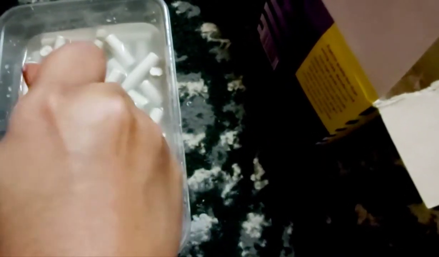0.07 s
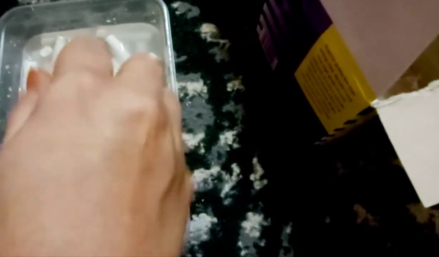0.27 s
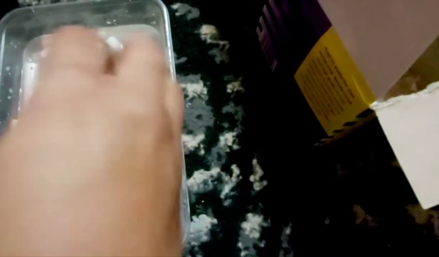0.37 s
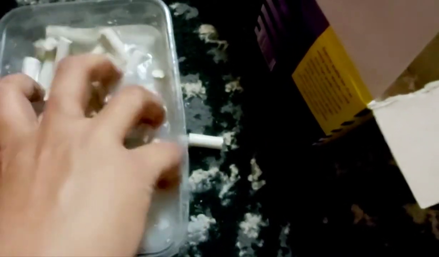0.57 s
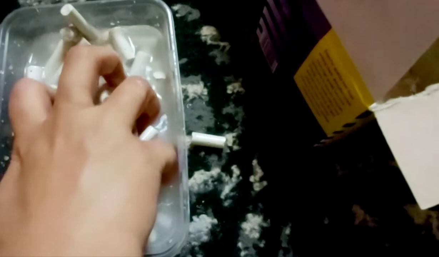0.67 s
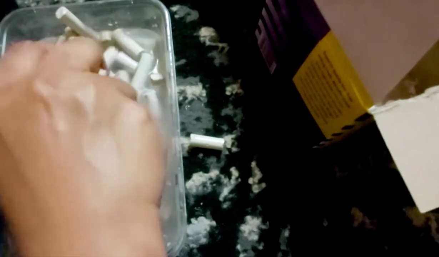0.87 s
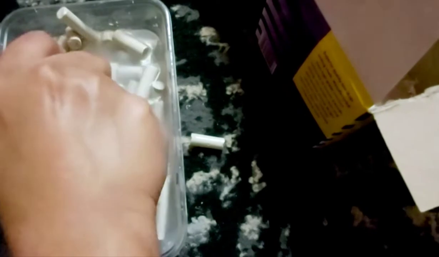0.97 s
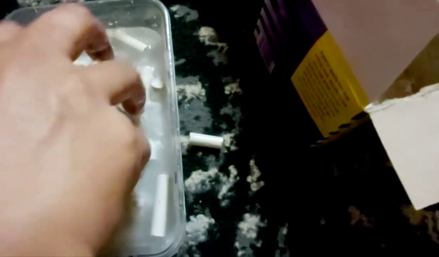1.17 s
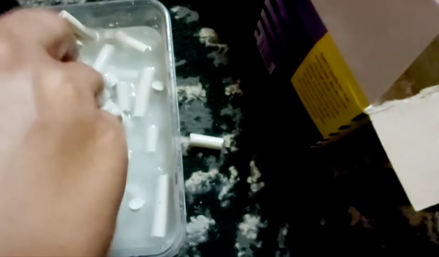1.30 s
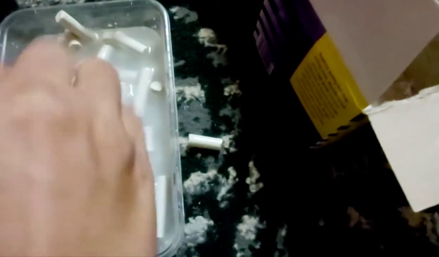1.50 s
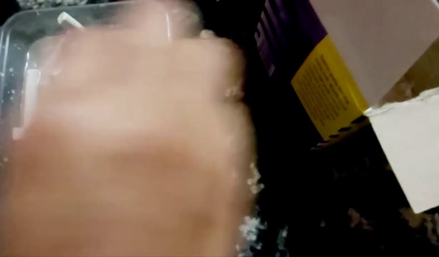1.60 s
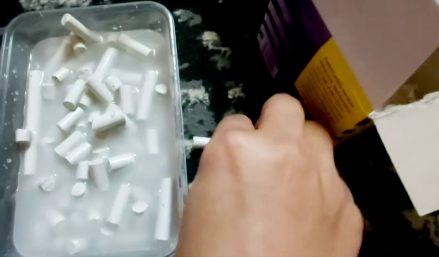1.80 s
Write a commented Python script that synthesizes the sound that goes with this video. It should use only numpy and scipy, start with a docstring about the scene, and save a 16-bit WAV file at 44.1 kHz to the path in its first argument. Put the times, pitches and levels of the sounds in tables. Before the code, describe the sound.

Broken chalk scrapes and rustles as a hand stirs it in a plastic tub of shallow water, close and slightly left. It starts softly, with a faint squeak at 0.4 seconds. From 0.5 seconds the pushes strengthen and sticks click together, sharpest near 0.95 and 1.35 seconds. The stirring dies away by 1.5 seconds, leaving a faint rustle and tick. Soft handling bumps rumble over quiet room tone.

```python
"""Broken chalk sticks, stirred by hand in a plastic tub of shallow water, close to a phone in a small room.
Each push drags the pieces in tiny slips that ring the tub, and wet crumbs rustle under the fingers.
Sticks knock together with sharp clicks, and one squeaks briefly as it slides.
The tub sits left of the phone's two microphones; soft handling bumps rumble over the room tone."""
import sys
import numpy as np
from scipy import signal
from scipy.fft import rfft, irfft
from scipy.io import wavfile

SR = 44100
rng = np.random.default_rng(int(sys.argv[2]) if len(sys.argv) > 2 else 0)


def file_out(sig):
    """Save sig as 16-bit WAV at sys.argv[1]."""
    # one column per channel
    cols = np.atleast_2d(sig).T
    # limit, then scale
    lim = np.clip(cols, -1, 1)
    pcm = np.round(lim * 32767).astype(np.int16)
    wavfile.write(sys.argv[1], SR, pcm)


N = 81585
T = np.arange(N) / SR
HZ = np.maximum(np.fft.rfftfreq(2 * N, 1 / SR), 1)

# Pushes that grind chalk along the tub. Each row: peak, rise and fall times in seconds, relative level
# in dB, gritty edge in dB against that level, tone in Hz, tone in dB against that level.
PUSHES = [(0.019, 0.045, 0.02, -47, -12.5, 940, -4), (0.103, 0.017, 0.033, -46.5, -9, 2340, -7),
          (0.177, 0.0012, 0.0029, -39.5, -21, 2670, -9), (.324, 0.0075, 0.017, -57.5, 8, 5470, -2),
          (0.515, 0.008, 0.022, -44.5, -37, 1170, -2), (0.544, 0.0083, 0.0051, -41, -11, 875, 0.5),
          (0.619, 0.022, 0.019, -35.5, -10.5, 2310, -9.5), (0.636, 0.0043, 0.01, -35.5, -7.5, 1010, -25),
          (0.696, 0.02, 0.035, -39.5, -16.5, 1400, -10), (0.747, 0.031, 0.023, -43.5, -14, 846, -1.5),
          (0.809, 0.017, 0.022, -34, -15, 1910, -8), (0.834, 0.0032, 0.024, -33.5, -18, 970, -23),
          (0.909, 0.025, 0.029, -41, -16, 2420, -20), (0.948, 0.0065, 0.008, -42.5, 6, 4330, -6),
          (0.961, 0.0083, 0.0071, -30, -12.5, 2140, -1), (1.025, 0.053, 0.03, -43, -10.5, 2500, -4),
          (1.073, 0.014, 0.013, -35, -5.5, 2700, -1.5), (1.12, 0.056, 0.05, -41.5, -19, 1350, -8),
          (1.2, 0.027, 0.0049, -48, -8.5, 2390, -1.5), (1.242, 0.0065, 0.0037, -48.5, -4, 985, 2),
          (1.296, 0.02, 0.036, -43, -15, 5650, -9), (1.324, 0.0053, 0.012, -29, -16, 910, 1.5),
          (1.367, 0.025, 0.02, -30.5, -7.5, 1020, -5), (1.403, 0.0076, 0.016, -34.5, -10, 710, -4)]
# Colour of the grinding. Each row: frequency in Hz, relative gain in dB.
SCRAPE_SPECTRUM = [(80, -6.5), (170, 3), (240, -5), (420, -0.5), (700, 1), (1300, -1), (2100, -0.5),
                   (2850, -3), (3400, -12.5), (5000, -26), (6500, -29), (16000, -34)]
# Modes of the wet tub. Each row: frequency in Hz, width in Hz, gain in dB.
TUB_RESONANCES = [(309.4, 49, 5), (513, 5.6, -15.5), (650, 23, -11), (1008, 35, -6.5), (2470, 70, -3),
                  (2599, 57, 2)]
# Swell of the wet crumbs. Each row: time in seconds, relative level in dB.
RUSTLE_LEVELS = [(0, -50), (.07, -63.5), (.12, -48.5), (.16, -55.5), (.185, -44), (.255, -57.5),
                 (.303, -60.5), (.32, -45), (.375, -56.5), (.405, -47.5), (.5, -56.5), (.6, -53),
                 (.77, -45), (.93, -45.5), (.98, -39), (1.04, -50.5), (1.08, -43), (1.14, -49), (1.27, -54),
                 (1.39, -47), (1.44, -57), (1.48, -77), (1.571, -70.5), (1.58, -51), (1.7, -75),
                 (1.85, -79)]
# Colour of the crumbs. Each row: frequency in Hz, relative gain in dB.
RUSTLE_SPECTRUM = [(400, -19), (1500, 10), (3000, 1), (3700, 1), (5500, 1.5), (7500, 0.5), (9000, -4),
                   (11500, 3.5), (12800, 2), (14000, -7), (16000, -15)]
# Swell of the handling bumps. Each row: time in seconds, relative level in dB.
BUMP_LEVELS = [(0, -59), (.04, -45.5), (.13, -54), (.22, -42.5), (.32, -48.5), (.45, -44.5), (.56, -49.5),
               (.72, -49.5), (.82, -55), (1.05, -57), (1.14, -53.5), (1.26, -46.5), (1.33, -70),
               (1.55, -62), (1.85, -57)]
# Colour of the bumps. Each row: frequency in Hz, relative gain in dB.
BUMP_SPECTRUM = [(20, -20), (45, 6.5), (83, 9.5), (115, 1), (170, -7.5), (300, -14), (600, -34.5),
                 (2000, -66.5)]
# Colour of the room tone. Each row: frequency in Hz, relative gain in dB.
ROOM_SPECTRUM = [(20, -9), (50, -9), (75, -3), (115, -12.5), (165, -1.5), (230, -11), (300, -11),
                 (480, -29), (1000, -19), (2300, -35.5), (3500, -51), (7000, -47.5), (16000, -45.5)]
# Sticks knocking together. Each row: start in seconds, relative level in dB, stick ring in Hz,
# then the ring and the tub knock, each in dB against the crack.
STICK_HITS = [(.0980, -49.5, 8700, -29, 1), (0.3043, -46.5, 4260, 6, 7.5), (.3060, -41, 5770, 10.5, 0),
              (0.4551, -50.5, 7440, -13, -20), (0.5427, -40, 6320, 4.5, -24), (0.597, -49, 10000, -7, -15),
              (0.6056, -48.5, 12400, -17, -17), (0.6368, -35.5, 10700, -2, -13),
              (0.6618, -43, 6900, -1, -20), (0.688, -45, 11800, -7, -12), (0.7245, -48.5, 6350, 0, -18),
              (0.7479, -49, 5760, 3, -15), (0.9533, -42, 5600, 11.5, -15), (0.9647, -17.5, 11530, -9, -41),
              (0.9668, -24, 13600, -1, -30), (1.114, -54, 6900, 3.5, -10),
              (1.2964, -43.5, 5670, 3.5, -16.5), (1.3532, -46.5, 9200, -0.5, 16),
              (1.3664, -23.5, 10300, -8, -1.5), (1.393, -40, 5440, 7, 11), (1.3993, -31, 10850, -7, -13),
              (1.4045, -41, 10100, -11, -3), (1.6451, -51.5, 11100, -10, -17)]
# The clicks shift as the hand moves. Each row: time in seconds, extra lead of the left side in dB.
CLICK_PAN = [(.55, 7.5), (.7, 2)]
# Colour of the cracks. Each row: frequency in Hz, relative gain in dB.
CRACK_SPECTRUM = [(300, -6), (6500, -11), (7800, 2), (9000, -6), (11000, 5), (14000, -3.5), (15500, -11.5),
                  (17000, -26)]
# Squeaks of a sliding stick. Each row: middle and length in seconds, pitch in Hz, relative level in dB.
STICK_CATCHES = [(.401, 0.012, 3010, -49.5), (.408, 0.039, 3030, -56), (0.413, 0.023, 2650, -61)]
# Left microphone over the right, for the whole scene. Each row: frequency in Hz, lead in dB.
LEFT_MIC_LEAD = [(60, 4.0), (250, 3.6), (550, 1.0), (1000, 1.2), (1900, 4.5), (2600, 10.5), (4200, 3),
                 (6200, 4.5), (7700, 1.5), (8800, 13), (10500, 11), (14000, 1.5)]

SCRAPE_DB, RUSTLE_DB, BUMP_DB, ROOM_TONE_DB, CLICK_DB = -3, -10.5, -1, -58.5, -3
TUB_DECAY_S, ROOM_T60_S = 0.0024, 0.081
SLIPS_PER_S, SLIP_SCATTER_DB, JUDDER_HZ, JUDDER_DB = 3200, 3.5, 111.16, 1.62
EDGE_HZ, EDGE_WIDTH_HZ, TONE_WIDTH_HZ = 4230, 2030, 695
CRUMBS_PER_S, CRUMB_SCATTER_DB, FLICKER_HZ, FLICKER_DB = 6000, 4, 110.8, 3
CRACK_S, CHIP_S, CHIP_DB, CLICK_SPAN_S = 0.00065, .007, -30, .002
RING_WIDTH_HZ, KNOCK_HZ, KNOCK_WIDTH_HZ = 1220, 1510, 1500
SQUEAK_FALL_HZ_PER_S, SQUEAK_WOBBLE_HZ = 4000, 129
TOP_HZ = 16300


def undb(db):
    """Decibels to gain."""
    return 10 ** (np.asarray(db) / 20)


def unit(x):
    """Scale each channel to rms 1."""
    return x / np.sqrt(np.mean(x ** 2, axis=-1, keepdims=True))


def envelope(points):
    """Gain over time from (s, dB) points."""
    return undb(np.interp(T, *np.array(points).T))


def colour(points):
    """Gain over frequency from (Hz, dB) points."""
    hz, db = np.array(points).T
    return undb(np.interp(np.log(HZ), np.log(hz), db))


def causal(gain):
    """Minimum-phase response with the given gains."""
    cepstrum = irfft(np.log(gain))
    cepstrum[1:N] *= 2
    cepstrum[N + 1:] = 0
    return np.exp(rfft(cepstrum))


def through(x, response):
    """Filter by a response, scaled to keep the power of white noise."""
    return irfft(rfft(x, 2 * N) * response / np.sqrt(np.mean(abs(response) ** 2)))[..., :N]


def resonate(x, hz, width_hz):
    """One resonance, gain 1 at its centre."""
    return signal.lfilter(*signal.iirpeak(hz, hz / width_hz, fs=SR), x)


def ring(x, hz, width_hz):
    """The same resonance twice over for steep sides, scaled to rms 1."""
    return unit(resonate(resonate(x, hz, width_hz), hz, width_hz))


def wander(rate_hz):
    """Smooth random drift with a spread near 1."""
    return np.interp(T * rate_hz, np.arange(4096), rng.standard_normal(4096))


def grains(per_s, scatter_db, shared):
    """Random tiny impacts, mostly weak, a few strong; some reach both microphones, some only one."""
    size = undb(scatter_db * np.minimum(rng.exponential(size=(3, N)), 4))
    sign = rng.choice([-1, 1], (3, N))
    hits = size * sign * (rng.random((3, N)) < per_s / SR)
    return unit(shared * hits[0] + hits[1:])


def pan(left_db):
    """Microphone gains that put the left side left_db above the right."""
    return undb(np.array([[left_db], [-left_db]]) / 2)


def space(x, tub_db, room_db):
    """Direct sound, quick reflections off the tub and a short room tail, unlike at each microphone."""
    tub_fade = np.exp(-T / TUB_DECAY_S) * (1 - np.exp(-T / .001))
    room_fade = undb(-60 * T / ROOM_T60_S) * (1 - np.exp(-T / .008))
    tub = unit(rng.standard_normal((2, N)) * tub_fade)
    room = unit(rng.standard_normal((2, N)) * room_fade)
    reflections = (undb(tub_db) * tub + undb(room_db) * room) / np.sqrt(N)
    echoes = signal.fftconvolve(np.atleast_2d(x), reflections, axes=1)[:, :N]
    return (x + echoes) / np.sqrt(1 + undb(tub_db) ** 2 + undb(room_db) ** 2)


def rumble(spectrum, shared):
    """Dull noise, partly common to both microphones."""
    noise = shared * rng.standard_normal(N) + rng.standard_normal((2, N))
    return unit(through(noise, colour(spectrum)))


def chalk_scrapes():
    """Each push swells and dies; its juddering slips ring the tub, with a gritty edge and its own tone."""
    body, edge, tone = (grains(SLIPS_PER_S, SLIP_SCATTER_DB, shared=.45) for _ in range(3))
    judder = unit(undb(JUDDER_DB * wander(JUDDER_HZ)))
    body_power = edge_power = tones = 0
    for peak, rise, fall, db, edge_db, tone_hz, tone_db in PUSHES:
        push = undb(db) * judder * np.exp(-np.maximum((peak - T) / rise, (T - peak) / fall))
        body_power += push ** 2
        edge_power += (undb(edge_db) * push) ** 2
        tones += undb(tone_db) * push * ring(tone, tone_hz, TONE_WIDTH_HZ)
    grind = through(body * np.sqrt(body_power), causal(colour(SCRAPE_SPECTRUM)))
    tub_ring = sum(undb(db) * resonate(grind, hz, width) for hz, width, db in TUB_RESONANCES)
    grit = np.sqrt(edge_power) * ring(edge, EDGE_HZ, EDGE_WIDTH_HZ)
    return undb(SCRAPE_DB) * space(tones + grind + tub_ring + grit, tub_db=-9.5, room_db=-10.5)


def crumb_rustle():
    """Wet crumbs and small drops crackle under the fingers, coming and going."""
    flicker = unit(undb(FLICKER_DB * wander(FLICKER_HZ)))
    crumbs = grains(CRUMBS_PER_S, CRUMB_SCATTER_DB, shared=0.32) * envelope(RUSTLE_LEVELS) * flicker
    crackle = through(crumbs, causal(colour(RUSTLE_SPECTRUM)))
    return undb(RUSTLE_DB) * space(pan(left_db=5) * crackle, tub_db=-12, room_db=-16)


def handling_bumps():
    """Handling comes through as soft swells of low rumble."""
    return undb(BUMP_DB) * envelope(BUMP_LEVELS) * rumble(BUMP_SPECTRUM, shared=1.0)


def room_tone():
    """The small room's steady low noise, stronger on the left."""
    return undb(ROOM_TONE_DB) * pan(left_db=6.5) * rumble(ROOM_SPECTRUM, shared=0.1)


def stick_clicks():
    """Sticks meet in a brittle crack with a trail of chips; the stick rings briefly and knocks the tub."""
    cracks = rings = 0
    for start, db, ring_hz, ring_db, knock_db in STICK_HITS:
        age = np.maximum(T - start, 0)
        contact = (T >= start) * (np.exp(-age / CRACK_S) + undb(CHIP_DB) * np.exp(-age / CHIP_S))
        crack, stick, tub = contact * rng.standard_normal((3, 2, N)) + 1e-18
        mic_gains = undb(db) * pan(np.interp(start, *np.array(CLICK_PAN).T))
        stick_ring = undb(ring_db) * ring(stick, ring_hz, RING_WIDTH_HZ)
        tub_knock = undb(knock_db) * ring(tub, KNOCK_HZ, KNOCK_WIDTH_HZ)
        cracks += mic_gains * unit(crack)
        rings += mic_gains * (stick_ring + tub_knock)
    clicks = through(cracks, causal(colour(CRACK_SPECTRUM))) + rings
    clicks *= np.sqrt(CLICK_SPAN_S * SR / N)  # a crack has the energy of its level held for this span
    return undb(CLICK_DB) * space(clicks, tub_db=-4.5, room_db=-14.5)


def stick_squeaks():
    """A wet stick slides in short catches, each a slightly falling squeak."""
    squeaks = 0
    for middle, length, hz, db in STICK_CATCHES:
        offset = T - middle
        pitch = hz - SQUEAK_FALL_HZ_PER_S * offset + SQUEAK_WOBBLE_HZ * wander(rate_hz=900)
        swell = np.exp(-(2 * offset / length) ** 2)
        squeaks += undb(db) * swell * np.sin(2 * np.pi * np.cumsum(pitch) / SR)
    return space(squeaks, tub_db=-9, room_db=-12)


def scene():
    """The tub stands close by, to the left of the phone, so the left microphone hears more."""
    background = handling_bumps() + room_tone()
    mix = chalk_scrapes() + stick_clicks() + stick_squeaks() + crumb_rustle() + background
    left_gain = np.sqrt(colour(LEFT_MIC_LEAD))
    return irfft(rfft(mix, 2 * N) * np.array([left_gain, 1 / left_gain]))[:, :N]


def record(dry):
    """The phone cuts off the highest treble steeply."""
    return signal.sosfilt(signal.ellip(8, .2, 70, TOP_HZ, fs=SR, output="sos"), dry)


dry = scene()
out = record(dry)
file_out(out)
```